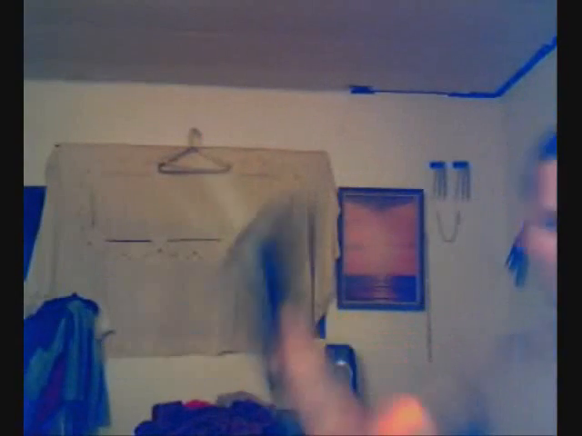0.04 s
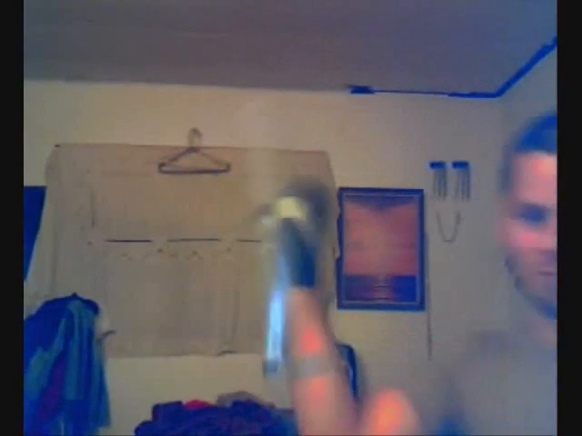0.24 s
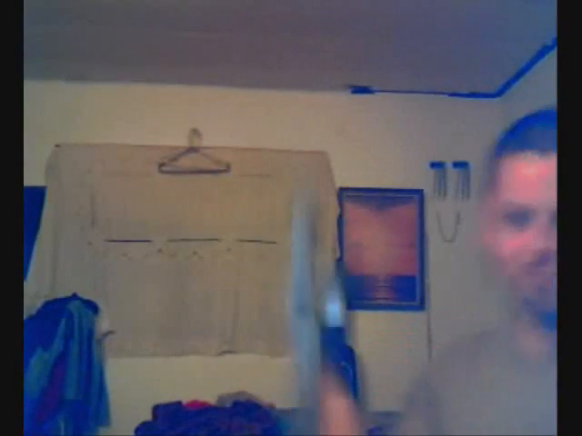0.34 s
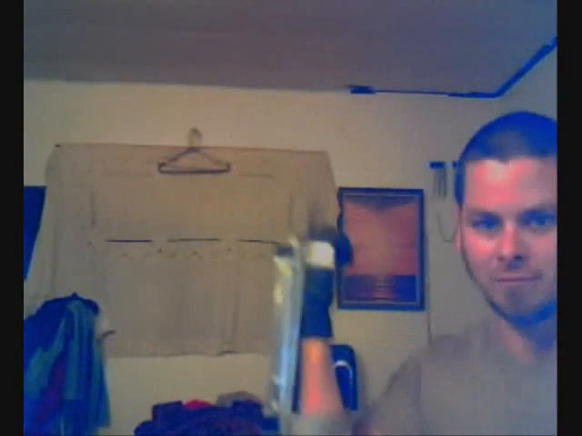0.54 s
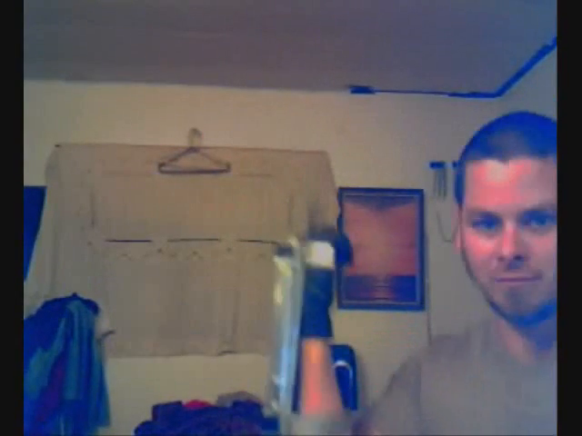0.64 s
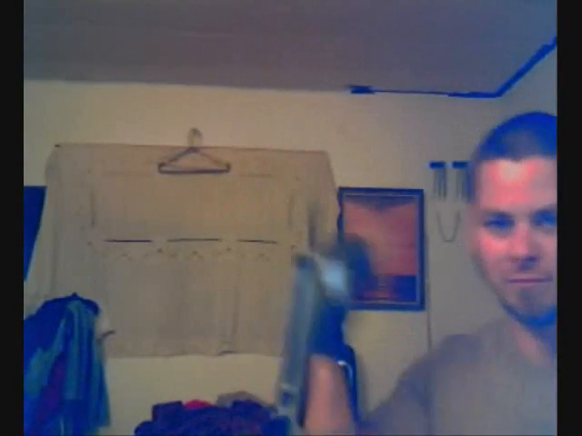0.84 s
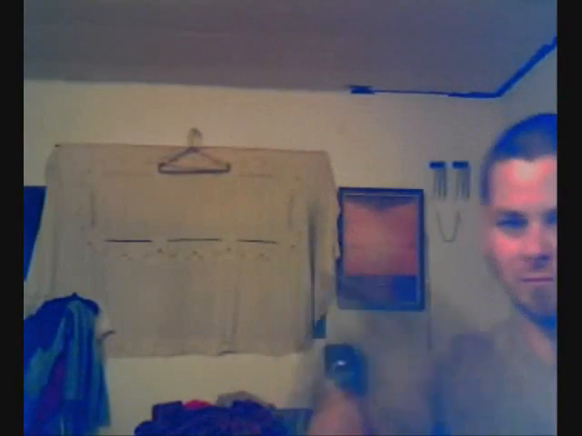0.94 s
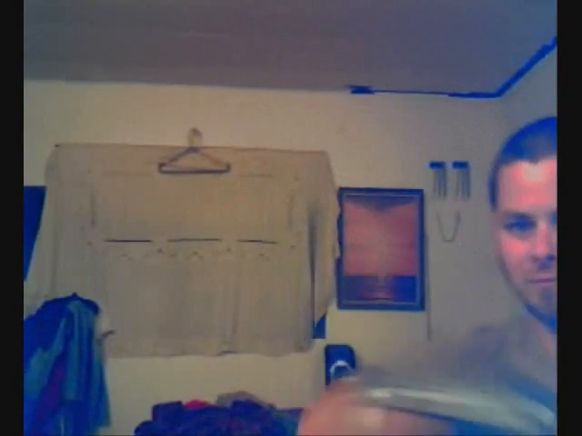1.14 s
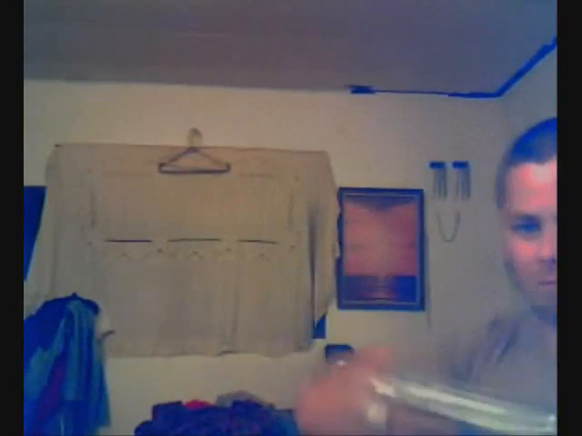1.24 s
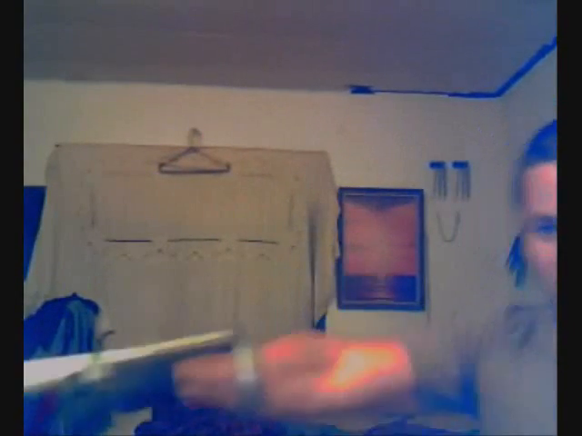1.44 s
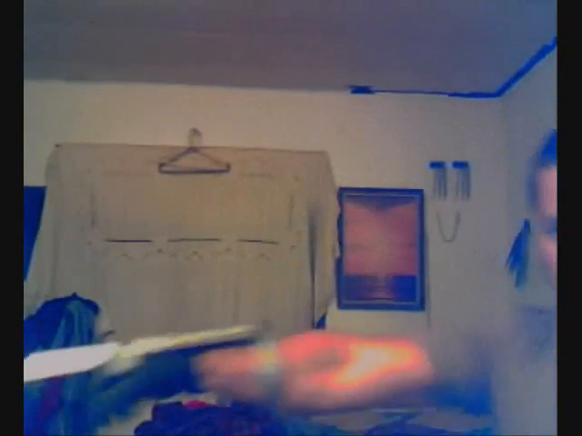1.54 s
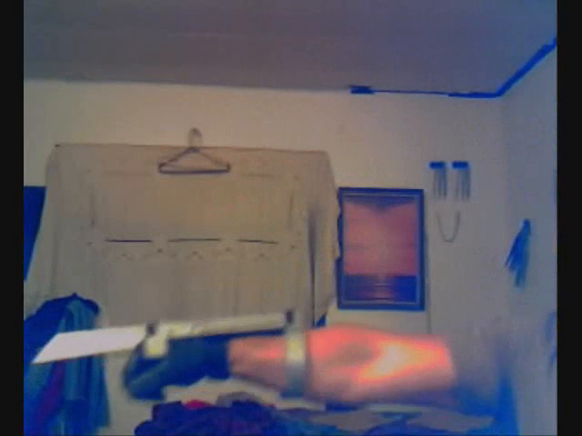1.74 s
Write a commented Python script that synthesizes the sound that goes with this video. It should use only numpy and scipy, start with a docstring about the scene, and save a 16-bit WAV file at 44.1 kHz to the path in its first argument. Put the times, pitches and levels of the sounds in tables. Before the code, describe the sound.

A steel blade slides on metal rails, close to a cheap microphone. Loose clicks from 0.07 s lead into a bright, piercing, hissing scrape at 0.22-0.36 s, crackling with overload, then a small click. Faint creeping friction comes around 0.83-0.98 s. Duller knocks at 1.12 s precede a second, grittier scrape at 1.22-1.36 s, followed by settling clicks. Low arm gusts, short room reflections, steady hiss, rumble and pulsing faint electrical buzz.

```python
"""Microphone hiss, room rumble and short buzz bursts come first, then a few loose clicks.
A homemade steel blade on a forearm slides in along its rails, shifts faintly, then shoots out, in a small bedroom.
Dense tiny impacts drive rails, blade and frame; the hissing scrapes overload the close microphone,
which adds a dry crackle of dense random impulses and saturates on loud peaks.
The swinging arm buffets the microphone with gusts of filtered noise and slow pressure bumps."""
import sys
import numpy as np
from scipy import signal
from scipy.fft import rfft, irfft, next_fast_len
from scipy.io import wavfile
from scipy.ndimage import uniform_filter1d

SR = 44100
rng = np.random.default_rng(int(sys.argv[2]) if len(sys.argv) > 2 else 0)


def persist_wave(psi):
    """Save psi, clipped to +-1, as 16-bit WAV."""
    counts = np.round(np.clip(psi, -1, 1) * 32767).astype(np.int16)
    wavfile.write(sys.argv[1], SR, np.atleast_2d(counts).T)


N = 79380  # samples: 1.8 s

# Spectra are relative: colour() evens out their overall power.
# background rumble of the room: (f/Hz, level/dB)
RUMBLE_COLOUR = [(15, 4), (35, -6), (60, -3.5), (115, -2.5), (180, -12), (280, -18.5), (1000, -25),
                 (3000, -35), (15000, -41.5)]
# hiss of the microphone's electronics: (f/Hz, level/dB)
HISS_COLOUR = [(50, 9.5), (400, 4), (1500, 1.5), (4000, -5), (6500, -4), (8100, 1), (9500, -4),
               (15500, -10)]
RUMBLE_DB, HISS_DB = -48, -51
# tones of the electrical buzz: (f/Hz, rms level/dB while it sounds)
BUZZ_TONES = [(1222, -59.5), (2444, -60.5), (3666, -63), (10083, -61)]
BUZZ_FIRST_S, BUZZ_LENGTH_S, BUZZ_PERIOD_S = 0.014, 0.027, 0.1333

# the blade knocks loosely in its rails: (t/s, rail level/dB, frame level/dB, time for the chatter to fall 20 dB/s)
KNOCKS = [(0.069, -28, -59, .008), (0.0836, -18.5, -55.5, 0.0045), (0.096, -17.5, -40.5, 0.02),
          (.1006, -15, -37, 0.005), (0.1632, -25, -56.5, .006), (0.1742, -6, -54, .002),
          (0.1829, -12.5, -48, 0.0026), (0.2231, -1, -42, 0.009), (.3888, -17, -36.5, 0.0045),
          (1.121, -21.5, -27.5, 0.0026), (1.1329, -11, -16, 0.0063), (1.138, -24.5, -21, .007),
          (1.147, -24.5, -34, 0.034), (1.2016, -28, -28, 0.014), (1.2255, -22.5, -15, 0.0073),
          (1.361, -18, -38, .005), (1.432, -36, -35, 0.0047), (1.44, -23, -39, 0.0045),
          (1.47, -30, -36, .004), (1.6625, -47.5, -63, .006)]
FIRST_TOUCH = 3.7  # first contact, added to a chatter that starts at 1

# colour of the rails: (f/Hz, level/dB)
RAIL_COLOUR = [(300, -35.5), (2000, -34), (4000, -32.5), (5200, -16.5), (6100, -16.5), (6700, -9.5),
               (7600, -4.5), (8300, -1.5), (8800, -2), (9400, -8), (10800, -14), (13000, -15.5),
               (15500, -15)]
# colour of the frame that carries them: (f/Hz, level/dB)
FRAME_COLOUR = [(200, -28.5), (1300, -22.5), (2000, -2.5), (2600, -7.5), (3050, -1.5), (3500, -6),
                (4500, 2), (5100, -2.5), (6500, -4.5), (10000, -3), (15500, -13)]
# ringing of the blade: (f/Hz, relative level/dB, t60/s)
BLADE_MODES = [(4510, -16, .12), (6796, -14, .12), (7090, 12.5, .12), (7300, -11, .14), (7440, -3, 0.19),
               (7580, -3.5, 0.047), (8280, -5.5, .25), (8710, -6, 0.33), (8315, 2.5, .2), (8715, 1, .17),
               (8970, -2.5, 0.19)]
RING_DB = -18

# how far the left microphone port leads the right: (f/Hz, phase/rad)
PORT_PHASE = [(0, 0.77), (5600, -0.35), (7000, -0.42), (8700, -1.4), (10200, -1.5), (11200, -.3),
              (15500, .2)]
# the soft furnishings swallow the top of the room's tail: (f/Hz, level/dB)
ROOM_COLOUR = [(1000, 0), (5000, -0.5), (8000, -2.5), (11000, -2), (15500, -3)]
# reflections off the arm and desk, then the room; levels relative to the direct sound
NEAR_T60_S, NEAR_DB, NEAR_RISE_S = 0.027, -0.5, 0.0011
ROOM_T60_S, ROOM_DB, ROOM_RISE_S = 0.22, -5.5, 0.008
EVEN_HZ = 400  # smoothing width when the echoes' colour is evened

# gusts of the swinging arm: (t/s, level/dB, width/s)
GUSTS = [(.07, -39, 0.014), (0.293, -32.5, .027), (1.21, -41, .012), (1.295, -39, 0.026)]
# colour of the gusts: (f/Hz, level/dB)
BUFFET_COLOUR = [(10, -11), (28, -2), (60, -15.5), (130, -16), (400, -68), (2000, -98)]
# air pushed onto the microphone by the arm: (t/s, height before the high-pass/dB)
PUFFS = [(.34, -21.5), (1.341, -19.5)]
PUFF_WIDTH_S, PUFF_CUT_HZ = 0.012, 1.63

# friction as the blade slides back in: (t/s, level/dB)
SLIDE_IN = [(.195, -43), (.209, -23), (.221, -14), (.226, -6.5), (.245, -1.5), (.265, -0.5), (.3, -1),
            (.335, -12), (.362, -20.5), (.41, -51)]
# friction as the blade creeps while the arm is held up: (t/s, level/dB)
CREEP = [(.8, -70), (.826, -50), (.834, -43), (.89, -49), (.945, -44.5), (.98, -59)]
# friction as the blade shoots out and settles: (t/s, level/dB)
SLIDE_OUT = [(1.19, -40), (1.216, -31.5), (1.226, -13), (1.24, -14.5), (1.262, -8), (1.295, -7.5),
             (1.325, -6), (1.357, -20.5), (1.41, -31), (1.49, -47)]
# how much each slide shakes the frame, relative to the rails
FRAME_IN_DB, FRAME_CREEP_DB, FRAME_OUT_DB = -22.5, -8.5, -10.5
CATCHES_PER_S, CATCH_SPREAD_DB = 9000, 2.5  # rate at speed 1; scale of the uneven sizes
RATE_FOLLOWS = 0.26  # exponent: the catches thin out as the blade slows
JUDDER_DB, JUDDER_HZ = 0.5, 120.9  # spread of the level wander; its random points per second

# moving centre of the squeal, mostly upward going in and downward coming out: (t/s, f/Hz)
SQUEAL_PITCH = [(.225, 7330), (.285, 7040), (.335, 8370), (1.25, 8650), (1.33, 7665), (1.45, 7700)]
SQUEAL_WIDTH_HZ, SQUEAL_DB = 1800, -4

# broad overload crackle of the microphone during the slide in: (t/s, level/dB)
CRACKLE_IN = [(.225, -48.5), (.252, -12.5), (.285, -6.5), (.305, -6.5), (.33, -11.5), (.345, -27.5),
              (.37, -33)]
# broad overload crackle of the microphone during the slide out: (t/s, level/dB)
CRACKLE_OUT = [(1.235, -31), (1.255, -18.5), (1.28, -15.5), (1.296, -7.5), (1.314, -9), (1.333, -18.5),
               (1.35, -38.5)]
# colour of the crackle: (f/Hz, level/dB)
CRACKLE_COLOUR = [(40, 2.6), (200, 0), (2000, -0.43), (6000, -1), (15500, -2)]

CEILING_DB, CLIP_HARDNESS = 1, 7  # ceiling relative to full scale; exponent of the knee
DC_OFFSET, CUTOFF_HZ = -0.022, 15800  # offset as a fraction of full scale


def from_db(db):
    """Decibels to gain."""
    return 10 ** (np.asarray(db) / 20)


def rms_one(x):
    """Scale to unit rms."""
    return x / np.sqrt(np.mean(x ** 2) + 1e-20)


def clock():
    """Time of every sample in seconds."""
    return np.arange(N) / SR


def envelope(curve):
    """Gain along a level curve, silent outside it."""
    return from_db(np.interp(clock(), *np.transpose(curve), left=-np.inf, right=-np.inf))


def colour(x, points):
    """Causal filter that follows a spectrum and keeps the power of white noise."""
    size = 2 * next_fast_len(N)
    hz, db = np.transpose(points)
    bins_hz = np.arange(size // 2 + 1) * SR / size
    gain = rms_one(from_db(np.interp(np.log(bins_hz + 1), np.log(hz), db)))
    # folding the cepstrum gives minimum phase
    cepstrum = irfft(np.log(gain))
    cepstrum[1:size // 2] *= 2
    cepstrum[size // 2 + 1:] = 0
    response = np.exp(rfft(cepstrum))
    return irfft(rfft(x, size) * response)[..., :N]


def drift(hz):
    """Smooth random wander of unit rms."""
    return rms_one(np.interp(clock() * hz, np.arange(N), rng.standard_normal(N)))


def background():
    """Room rumble and microphone hiss as coloured noise, with regularly gated tones of electrical buzz."""
    t = clock()
    gate = (t - BUZZ_FIRST_S) % BUZZ_PERIOD_S < BUZZ_LENGTH_S
    tones = sum(np.sqrt(2) * from_db(db) * np.sin(2 * np.pi * (hz * t + rng.random()))
                for hz, db in BUZZ_TONES)
    rumble = from_db(RUMBLE_DB) * colour(rng.standard_normal(N), RUMBLE_COLOUR)
    hiss = from_db(HISS_DB) * colour(rng.standard_normal((2, N)), HISS_COLOUR)
    return gate * tones + rumble + hiss


def knocks():
    """Each knock is one sharp contact and a quickly dying chatter on the rails and the frame."""
    force = np.zeros((2, N))
    for s, rail_db, frame_db, length in KNOCKS:
        age = clock() - s
        shape = (age >= 0) * from_db(-20 * np.abs(age) / length)
        shape[int(s * SR)] += FIRST_TOUCH
        force += from_db([[rail_db], [frame_db]]) * shape
    return force * rng.choice([-1, 1], (2, N))


def steel(rail_force, frame_force):
    """Forces excite the broad bright rails, the blade's decaying modes and the duller frame."""
    t = clock()[:SR // 2]
    modes = sum(from_db(db - 60 * t / t60) * np.sin(2 * np.pi * hz * t) for hz, db, t60 in BLADE_MODES)
    ring = signal.fftconvolve(rail_force, modes / np.linalg.norm(modes))[:N]
    return colour(rail_force, RAIL_COLOUR) + from_db(RING_DB) * ring + colour(frame_force, FRAME_COLOUR)


def echoes(x, t60, rise):
    """Diffuse reflections: decaying noise of even colour, different at the two microphone ports."""
    t = clock()[:SR // 2]
    fade_in = np.clip(t / rise, 0, 1)
    tail = rfft(rng.standard_normal((2, len(t))) * from_db(-60 * t / t60) * fade_in)
    tail /= np.sqrt(uniform_filter1d(np.abs(tail) ** 2, EVEN_HZ * len(t) // SR, axis=1))
    return signal.fftconvolve(x[None], irfft(tail)[:, :SR // 3], axes=1)[:, :N]


def bedroom(x):
    """Direct sound, out of phase at the two ports by frequency, with near reflections and a short room tail."""
    phase = np.interp(np.arange(N // 2 + 1) * SR / N, *np.transpose(PORT_PHASE))
    direct = irfft(rfft(x) * np.exp(.5j * phase * [[1], [-1]]), N)
    near = from_db(NEAR_DB) * echoes(x, NEAR_T60_S, NEAR_RISE_S)
    room = from_db(ROOM_DB) * echoes(colour(x, ROOM_COLOUR), ROOM_T60_S, ROOM_RISE_S)
    # keep the total power whatever the mix
    return (direct + near + room) / np.sqrt(1 + from_db(NEAR_DB) ** 2 + from_db(ROOM_DB) ** 2)


def air():
    """The swinging arm buffets the microphone with low noise and pushes a slow pressure bump late in each slide."""
    t = clock()
    bumps = sum(from_db(db) * np.exp(-.5 * ((t - s) / PUFF_WIDTH_S) ** 2) for s, db in PUFFS)
    gusts = sum(from_db(db) * np.exp(-.5 * ((t - s) / width) ** 2) for s, db, width in GUSTS)
    buffet = gusts * colour(rng.standard_normal(N), BUFFET_COLOUR)
    return signal.lfilter(*signal.butter(1, PUFF_CUT_HZ, "high", fs=SR), bumps) + buffet


def catches(speed=1):
    """Dense tiny impacts of uneven size, as steel catches on steel; fewer at low speed, with even power."""
    sizes = rms_one(from_db(CATCH_SPREAD_DB * np.minimum(rng.exponential(1, N), 4)))
    signed = sizes * rng.choice([-1, 1], N)
    chance = np.clip(CATCHES_PER_S * speed ** RATE_FOLLOWS / SR, 1e-2, 1)
    return signed * (rng.random(N) < chance) / np.sqrt(chance)


def slides():
    """Friction forces on rails and frame: catches under the slide levels; the rail level stands in for speed."""
    rails, frame = 0, 0
    for curve, frame_db in ((SLIDE_IN, FRAME_IN_DB), (CREEP, FRAME_CREEP_DB), (SLIDE_OUT, FRAME_OUT_DB)):
        level = envelope(curve)
        rails = rails + level
        frame = frame + level * from_db(frame_db)
    judder = from_db(JUDDER_DB * drift(JUDDER_HZ))
    return np.array([rails * catches(rails), frame * catches(rails)]) * judder


def squeal(force):
    """A broad resonance of the blade, its moving pitch standing for the blade's free length."""
    pitch = np.interp(clock(), *np.transpose(SQUEAL_PITCH))
    turn = np.exp(2j * np.pi * np.cumsum(pitch) / SR)
    # shift the pitch down to zero, low-pass, and shift back up
    lowpass = signal.butter(2, SQUEAL_WIDTH_HZ / 2, fs=SR, output="sos")
    band = signal.sosfilt(lowpass, force * rng.choice([-1, 1], N) / turn + 1e-18)
    return from_db(SQUEAL_DB) * np.sqrt(2 * SR / SQUEAL_WIDTH_HZ) * np.real(band * turn)


def overload_crackle():
    """Dry full-range crackle of the overloaded microphone input in each slide, different in the two channels."""
    level = envelope(CRACKLE_IN) + envelope(CRACKLE_OUT)
    # the same dense random impulses as the catches, at a constant rate
    impulses = np.array([catches(), catches()])
    return colour(level * impulses, CRACKLE_COLOUR)


def scene():
    """The blade in the room, with the microphone's dry overload crackle, moving air and the background."""
    friction = slides()
    blade = steel(*(friction + knocks())) + squeal(friction[0])
    return bedroom(blade) + overload_crackle() + air() + background()


def record(dry):
    """The input saturates on loud peaks and sits slightly off zero; a steep low-pass cuts the top."""
    knee = (1 + np.abs(dry / from_db(CEILING_DB)) ** CLIP_HARDNESS) ** (1 / CLIP_HARDNESS)
    clipped = dry / knee + DC_OFFSET
    return signal.sosfiltfilt(signal.ellip(10, .05, 60, CUTOFF_HZ, fs=SR, output="sos"), clipped)


dry = scene()
out = record(dry)
persist_wave(out)
```